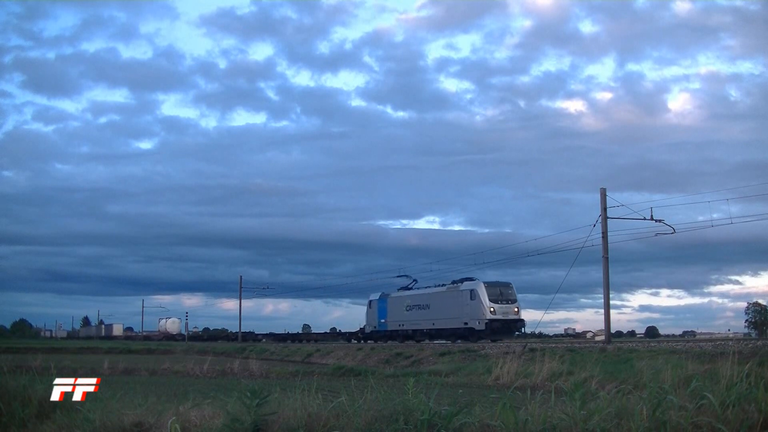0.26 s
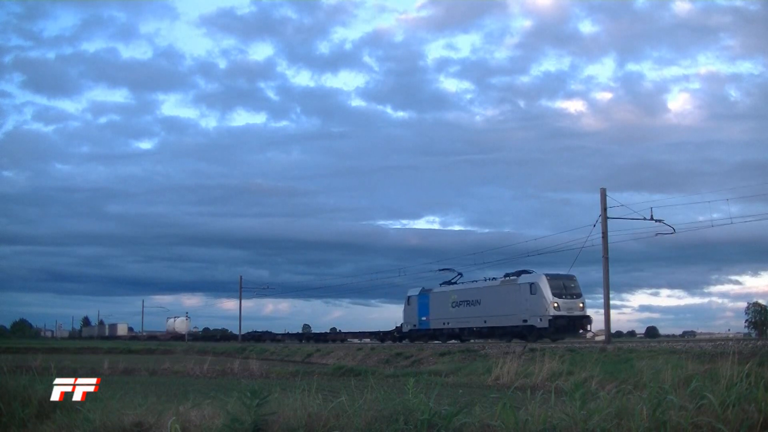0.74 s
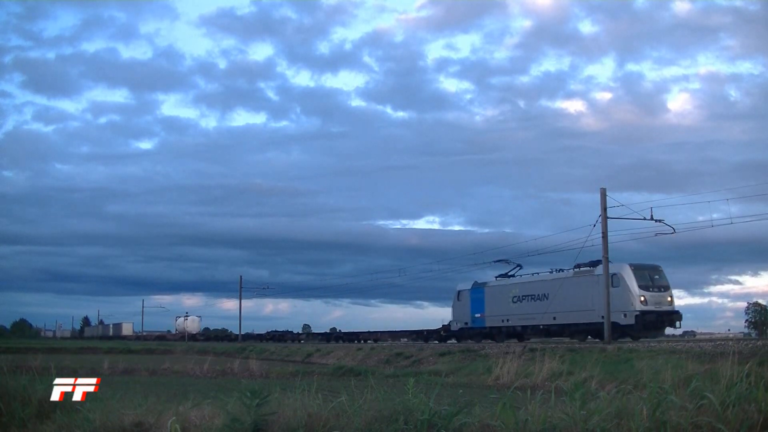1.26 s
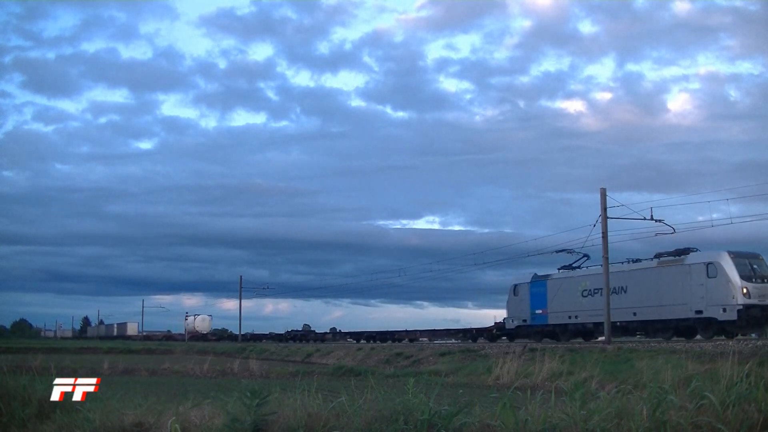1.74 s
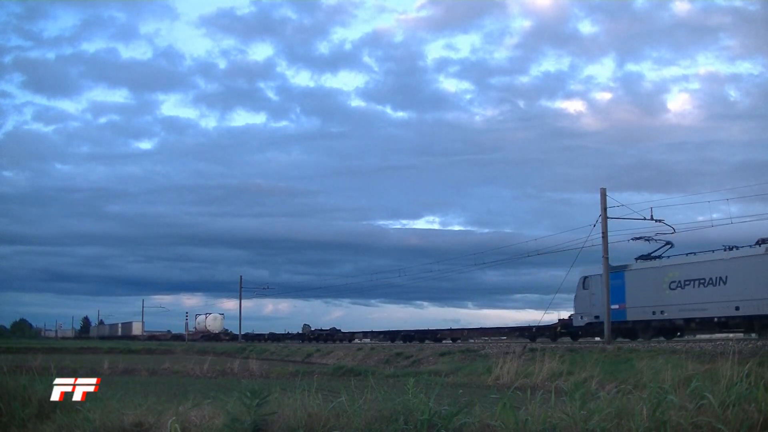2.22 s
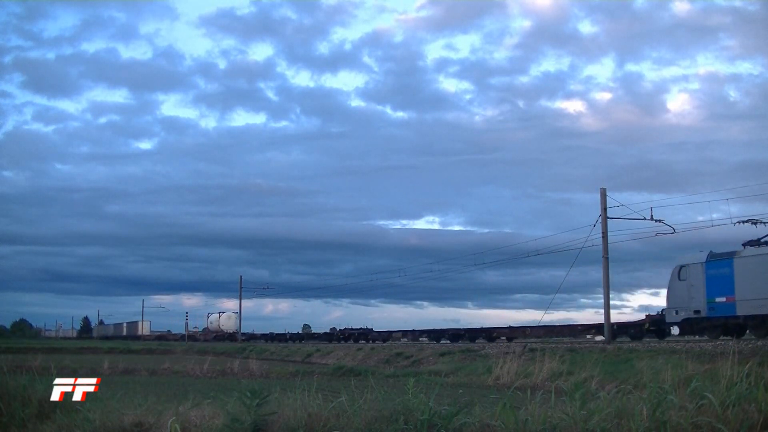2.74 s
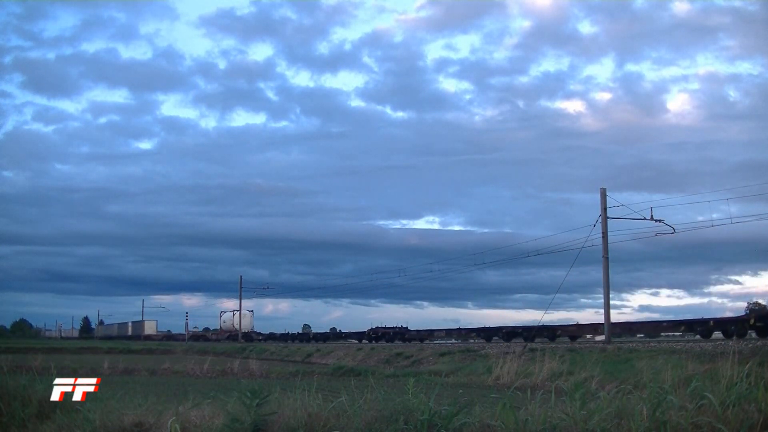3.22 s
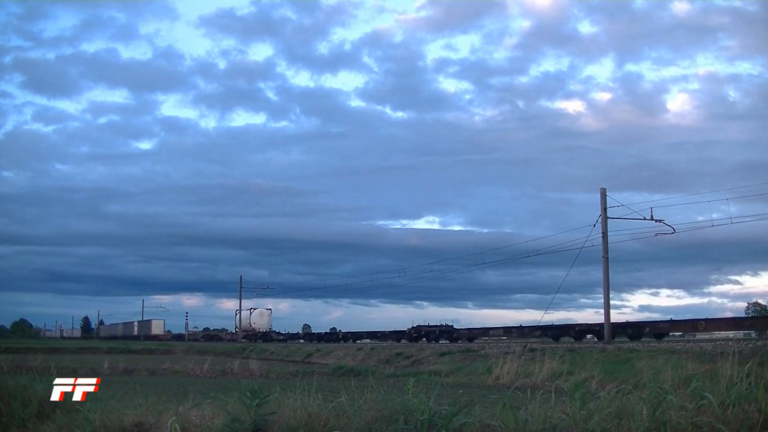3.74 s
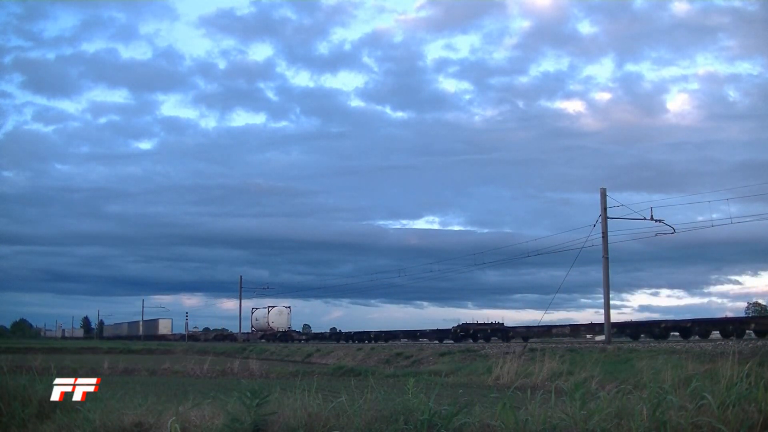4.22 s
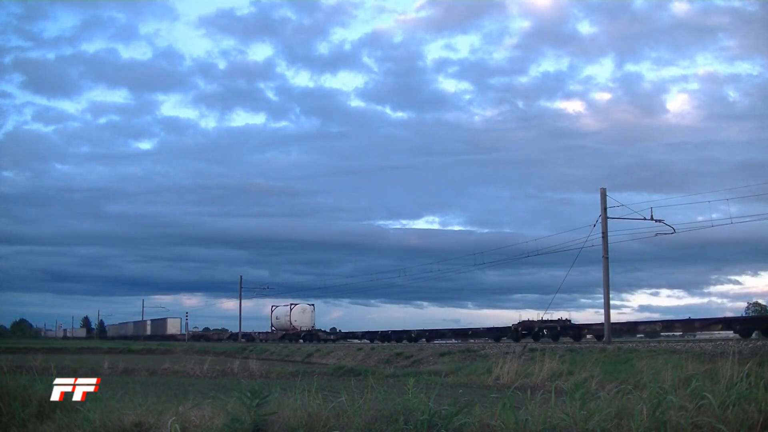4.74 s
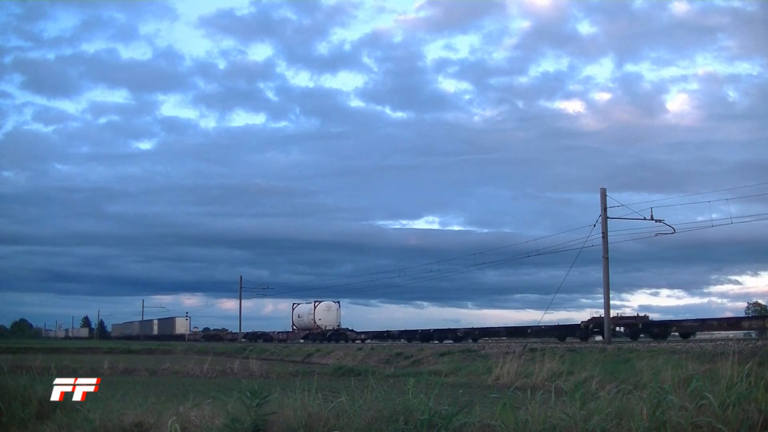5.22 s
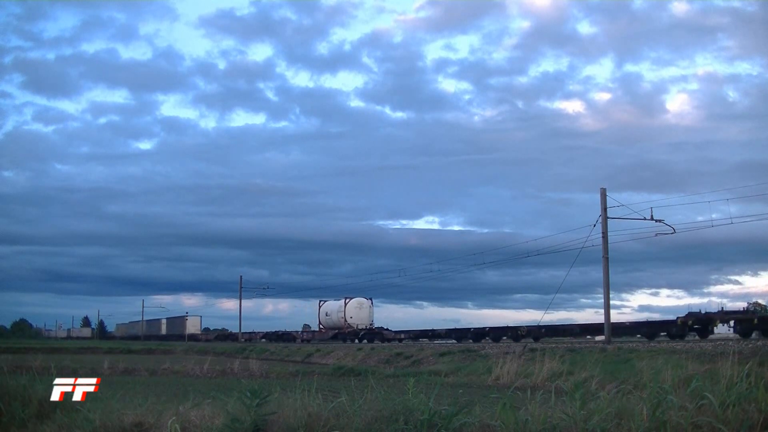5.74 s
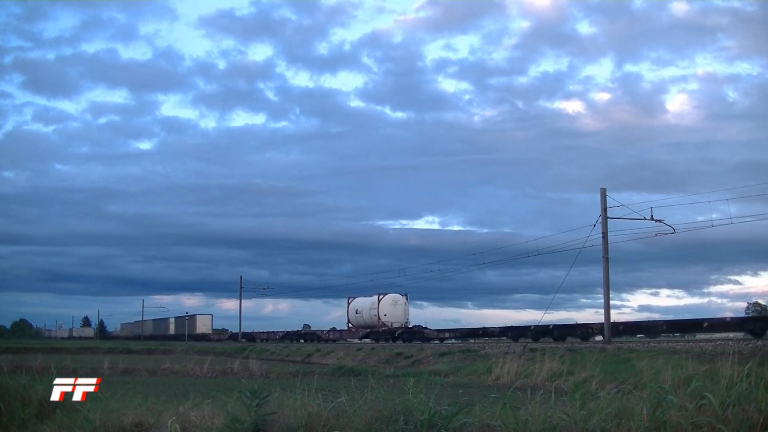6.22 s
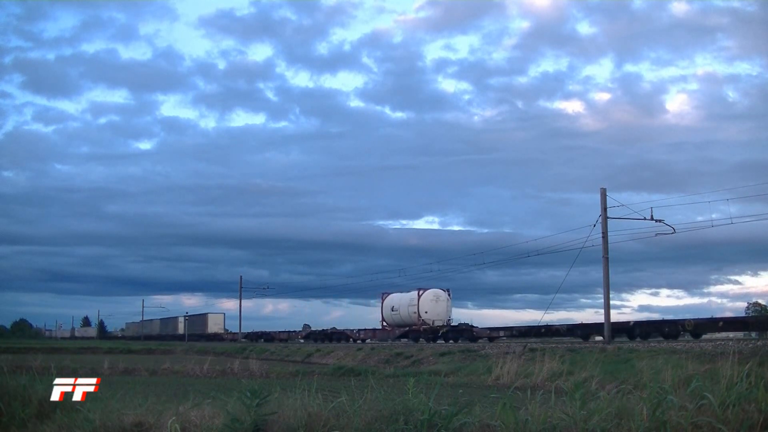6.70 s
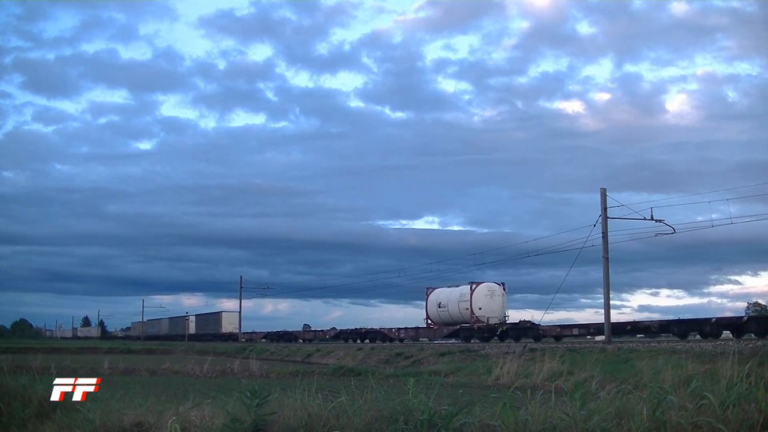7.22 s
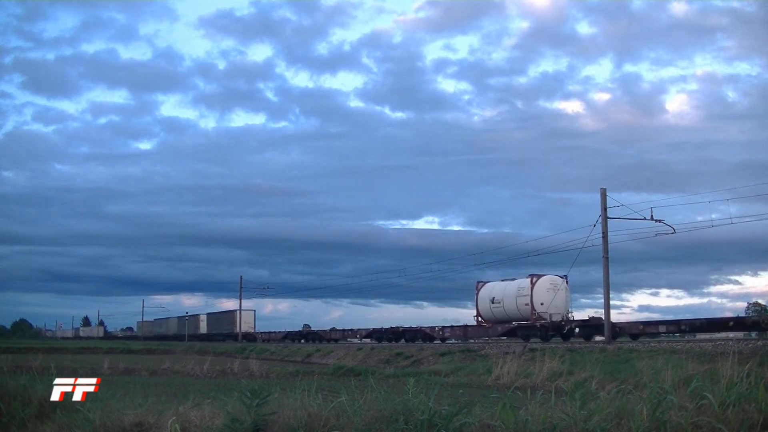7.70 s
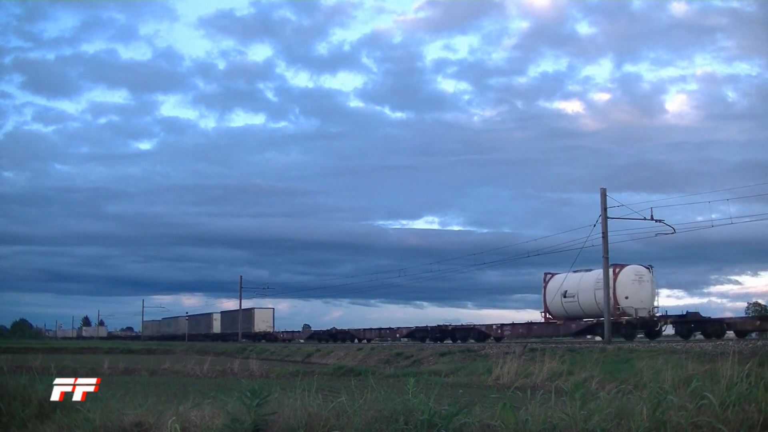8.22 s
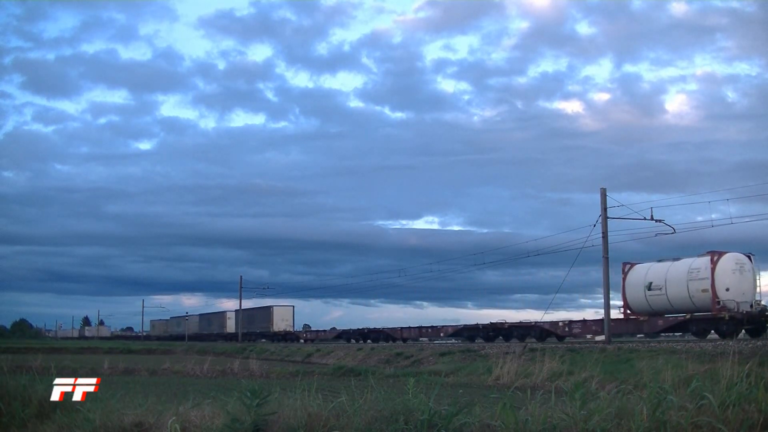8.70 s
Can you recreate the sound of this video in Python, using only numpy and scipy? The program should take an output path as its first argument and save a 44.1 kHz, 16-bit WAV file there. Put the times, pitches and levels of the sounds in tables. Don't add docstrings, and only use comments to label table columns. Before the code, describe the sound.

Outdoors beside a field, a small stereo camera some way from the track hears a freight train pass. The electric locomotive approaches with whining motors, humming blowers and airy hiss, its pitch sagging as it goes by. Rail roar and ringing wheels swell, then wagons roll past with bursts of loose brake gear rattling and clinking. A very faint breeze flutters underneath.

```python
import sys
import numpy as np
from scipy import signal
from scipy.fft import rfft, irfft, next_fast_len
from scipy.io import wavfile
from scipy.ndimage import uniform_filter1d, map_coordinates

SR = 44100
rng = np.random.default_rng(int(sys.argv[2]) if len(sys.argv) > 2 else 0)


def transcribe(signal):
    frames = np.atleast_2d(signal).T
    limited = np.clip(frames, -1, 1)
    pcm = np.round(limited * 32767).astype(np.int16)
    wavfile.write(sys.argv[1], SR, pcm)


def ratio(d):
    e = np.asarray(d, float) / 20
    return 10 ** e


N = 394694

# time in seconds, level in dB under its full level.
APPROACH = [(0, -7.5), (.5, -6.5), (1.5, -4.8), (2.45, -2.5), (3.85, -.5), (5.2, -0.23), (5.8, -0.16),
            (7.4, 0), (8.95, 0)]
# time in seconds, pitch ratio.
DOPPLER = [(0, 1.01), (4, 1.0), (8.95, .988)]
# time in seconds, strength, half length in seconds.
BOGIES = [
    (4.0, 0.52, 0.14),
    (4.78, 1.2, 0.22),
    (5.25, 0.65, 0.24),
    (6.0, 0.66, 0.1),
    (6.3, 1.15, 0.2),
    (6.85, 0.45, .12),
    (7.15, .5, 0.11),
    (7.75, 0.88, 0.31),
    (8.2, 0.38, 0.15),
    (8.95, 0.41, .2),
]
# frequency in Hz, level in dB per Hz.
RAIL_FAR = [(59, -74), (100, -29), (292, -18.5), (351, -24.5), (383, -15), (461, -16.5), (528, -9.5),
            (896, -12.5), (1000, -3), (1090, -8.5), (1900, -9), (2470, -48), (4180, -120)]
RAIL_NEAR = [(59, -74), (100, -32.5), (212, -18.5), (285, -18.5), (383, -13), (444, -12.5), (515, -7),
             (736, -2.5), (1220, -8.5), (1350, -5.5), (1660, -13.5), (1790, -3.5), (1900, -3), (2470, -27),
             (4180, -120)]
# frequency in Hz, level in dB per Hz.
WHEEL_FAR = [(940, -40), (1600, -16), (1940, -6.5), (1980, -8), (2110, -6), (2270, -11.5), (2490, -4),
             (3010, -10), (3980, -14), (4340, -12.5), (5150, -15), (6020, -33.5), (6300, -61), (8190, -60),
             (13900, -120)]
WHEEL_NEAR = [(940, -38), (1600, -7), (1680, -13), (1800, -4), (2140, -2.5), (2470, 0.5), (2670, 1),
              (2890, 1), (3220, -1), (3740, 0.5), (3940, -1.5), (4340, -1), (5210, -7), (5910, -23.5),
              (6300, -19), (8190, -43), (13900, -120)]
# frequency in Hz, level in dB per Hz.
HISS_FAR = [(3410, -38), (5800, -12), (6190, -17), (6980, -1.5), (7220, 0.5), (7580, 1.5), (8570, -7),
            (9560, -21), (10800, -31), (14000, -50), (22000, -120)]
HISS_NEAR = [(3410, -21), (5800, -7.5), (6140, -15.5), (7090, 1.5), (7540, 2.5), (8840, -6), (10100, -26.5),
             (10800, -22), (14000, -50), (22000, -120)]
# time in seconds, lift in dB, half length
# in seconds.
HISS_SWELL = [
    (1.75, 3, .45),
]
# frequency in Hz, spread between wheels in Hz, line width in Hz,
# level in dB against the wheel rush.
DISC_NOTES = [(831, 30, 20, -27), (1827, 25, 25, -24), (2003, 40, 25, -23), (2543, 38, 20, -17),
              (3045, 60, 30, -21), (3710, 24, 28, -21), (4260, 35, 25, -22), (4485, 30, 25, -21.5),
              (5200, 33, 30, -35)]
# time in seconds, length in seconds, frequency in Hz, level in dB.
SINGING_WHEELS = [(0.068, 0.15, 2590, -42), (0.41, 0.13, 4284, -45), (0.42, 0.22, 5290, -49),
                  (2.42, .08, 1920, -43), (2.53, 0.11, 3717, -41), (2.6, .09, 2500, -35),
                  (2.63, .08, 2650, -39), (2.76, .08, 2535, -37), (2.69, .05, 1920, -43),
                  (2.9, .07, 2500, -38), (3.55, .08, 2520, -40), (3.76, .07, 2906, -42),
                  (4.52, .08, 3746, -41), (5.46, .08, 4457, -38), (5.62, .08, 2490, -38),
                  (7.41, .07, 2605, -41), (7.41, .07, 3703, -42), (3.79, 0.42, 4248, -37.5),
                  (3.96, 0.24, 2552, -38), (4.03, 0.44, 3718, -36), (4.398, 0.23, 4308, -37),
                  (4.468, 0.34, 2536, -32), (5.02, 0.18, 2549, -39), (5.32, 0.8, 3720, -40),
                  (5.4, 0.73, 2495, -38), (5.987, 0.19, 2550, -37), (6.34, 0.14, 2511, -37),
                  (6.847, 0.3, 3720, -33), (7.76, 0.33, 2510, -43), (8.06, 0.11, 2490, -36),
                  (8.39, 0.15, 2490, -36), (8.92, 0.09, 1966, -46)]
# time in seconds, level in dB, half length in seconds.
RAIL_BOUNCE = [
    (4.5, -49, .4),
    (5.0, -46, .1),
    (5.75, -44, 0.37),
    (6.3, -45.5, .12),
    (6.9, -48, .3),
    (7.8, -43, 0.18),
    (8.3, -42, 0.24),
]
# time in seconds, level in dB, half length in seconds.
WHINE = [(.05, -50, .15), (.55, -56, .25), (1.317, -44, 0.095), (1.574, -46, 0.063), (1.85, -49, 0.27),
         (2.4, -45, 0.15), (2.717, -40, .14), (2.92, -49, .07), (3.45, -40, 0.094), (3.774, -42, .12),
         (4.222, -46, 0.092), (4.2, -47, 0.55), (4.95, -45, .06)]
# time in seconds, level in dB, half length in seconds.
OCTAVE = [
    (.78, -46, 0.13),
    (1.28, -46, 0.11),
    (1.68, -46, .1),
    (2.0, -49, .1),
    (2.5, -48, 0.29),
    (3.3, -50, .15),
]
# time in seconds, level in dB, half length in seconds.
GEARBOX = [
    (2.0, -49.5, 0.39),
    (2.682, -44, .28),
]
# time in seconds, level in dB, fall in seconds.
BLOWS = [(4.012, -35, .078), (4.368, -34, .044), (4.697, -31, .16), (4.82, -29.5, .05), (5.988, -30, 0.22),
         (6.114, -24.5, .049), (6.216, -29, .046), (6.392, -27.5, 0.07), (6.43, -26.5, .079),
         (6.474, -30, .05), (6.801, -34, .079), (7.146, -30.5, .074), (7.67, -28, 0.072), (7.771, -29, .04)]
# time in seconds, level in dB.
TICKS = [(3.956, -33.5), (4.072, -32), (4.556, -37), (4.596, -30), (4.65, -32), (4.773, -33), (4.888, -32),
         (4.93, -34), (5.03, -33), (5.402, -28), (5.885, -29), (5.942, -30), (6.045, -33), (6.167, -31),
         (6.264, -29), (6.305, -32), (6.345, -33), (6.369, -25.5), (6.891, -35), (7.03, -34), (7.119, -33),
         (7.563, -27), (7.607, -28), (7.725, -29), (7.85, -34), (7.9, -34), (8.148, -35), (8.2, -31),
         (8.897, -33)]
# frequency in Hz, width in Hz, level in dB.
GEAR = [(3080, 56, -0.5), (3495, 64, 5), (3900, 30, 2), (4330, 55, 2.5), (4740, 31, -2), (5200, 66, -9),
        (6760, 50, -20), (7400, 50, -3), (7700, 40, -5), (7900, 23, -16), (8330, 45, -17), (8900, 45, -7),
        (9580, 23, -19), (10930, 35, -28), (11990, 45, -29), (12900, 40, -30), (13270, 35, -28)]
# frequency in Hz, level in dB.
CRACK = [(800, -50), (1600, -28), (3000, 2.5), (4500, 5), (5300, 2), (6100, -13.5), (7400, 2.5),
         (8600, -6.5), (10300, -27), (13000, -26), (14500, -34), (15800, -44)]
# frequency in Hz, level in dB.
STRIKE = [(1500, -40), (3000, -4), (5200, 0), (6100, -10), (7400, 2), (9000, -9), (10300, -27),
          (13000, -24), (15800, -35)]
# time in seconds, frequency in Hz, level in dB, length
# in seconds.
PINGS = [(4.016, 7120, -41, .04), (4.017, 8153, -42, .049), (4.705, 8326, -42, .11), (4.7, 5630, -47, .14),
         (4.75, 7838, -44, .04), (4.773, 7321, -36, .03), (4.82, 4160, -36, .097), (5.408, 3703, -36, .027),
         (6.045, 6870, -40, .03), (6.115, 7400, -38, .028), (6.207, 5733, -52, .22),
         (6.222, 7770, -44, .09), (6.345, 3080, -39, .15), (6.348, 3490, -33, 0.13), (7.03, 7300, -38, .03),
         (7.447, 4465, -34, .05), (7.54, 2950, -28, .018), (7.562, 5200, -39, 0.09),
         (7.605, 7400, -37, .023), (7.669, 5100, -34, .02), (7.674, 13235, -56, .045),
         (7.68, 7250, -48, .042), (7.692, 5660, -43, .07), (7.768, 4690, -29, .022),
         (7.85, 3000, -28, .025), (7.89, 5134, -37, .05), (7.915, 7850, -45, .055),
         (4.698, 7260, -41, .08), (4.698, 8555, -50, .035), (4.72, 4048, -39, .025),
          (4.735, 3460, -36, .035), (4.735, 6258, -53, .04), (4.803, 12000, -63, .06),
          (4.825, 5627, -48, .04), (5.015, 4608, -41, .025), (5.108, 3402, -38, .03),
          (5.99, 8900, -52, .03), (5.994, 3488, -37, .025), (5.998, 11943, -64, .07),
          (6.085, 3919, -36, .025), (6.112, 5627, -44, .09), (6.114, 12000, -57, .02),
          (6.114, 8900, -50, .035), (6.115, 8383, -46, .05), (6.115, 3488, -35, .035),
          (6.116, 4400, -35, .035), (6.217, 4177, -37, .025), (6.217, 8555, -49, .06),
          (6.219, 8326, -49, .04), (6.265, 4651, -42, .03), (6.285, 7751, -42, .03),
          (6.315, 8326, -46, .04), (6.35, 5627, -46, .06), (6.352, 4608, -36, .09),
          (6.362, 2928, -34, .035), (6.4, 4823, -41, .03), (6.405, 10508, -63, .07),
          (6.405, 12116, -58, .07), (6.44, 3057, -31, .045), (6.89, 3370, -37, .035),
          (7.548, 4460, -38, .025), (7.59, 3359, -40, .04), (7.612, 13551, -65, .09),
          (7.678, 3789, -34, .04), (7.682, 9244, -57, .04), (7.695, 5189, -44, .04),
          (7.718, 4220, -35, .035), (7.72, 6660, -48, .045), (7.737, 6144, -53, .045),
          (7.798, 6660, -48, .03), (7.892, 3488, -35, .045), (7.89, 4435, -38, .03), (7.9, 3680, -41, .05),
          (7.91, 3186, -40, .04), (8.845, 8842, -50, .03)]
# frequency in Hz, level in dB,
# length in seconds.
BRAKE_ROD = [(3900, -43, .06), (5615, -50, .2), (5733, -48, .24), (7300, -36, 0.092), (7755, -41, .04),
             (8469, -44, .027)]
BRAKE_BEAM = [(3880, -32, 0.08), (5180, -47, .08), (7330, -36, .1), (7720, -39, .09), (8450, -42, .047),
              (5610, -42, 0.059)]
BRAKE_BLOCK = [(2895, -32, 0.05), (4345, -31, .075), (9790, -57, .05), (10938, -59, .05), (13264, -53, .06)]
# frequency in Hz, level in dB per Hz.
AIR_FAR = [(5880, -39), (10000, -9), (11400, 3.5), (12900, 1), (14000, -6), (15100, -4), (15600, 2)]
AIR_NEAR = [(7500, -20), (9300, 7), (10300, -6.5), (11400, -4.5), (12800, 1.5), (13400, 1.5), (14600, -1),
            (15600, -16)]
# time in seconds, lift in dB, half length in seconds.
PUFFS = [
    (.9, 3, .15),
    (3.27, 5, 0.087),
    (3.4, 6, .08),
    (3.5, 5, .04),
    (3.71, 4.5, 0.062),
    (6.43, 8, 0.056),
]
# frequency in Hz, level in dB.
SCATTER = [(200, -19), (700, -21), (1500, -35), (3000, -20), (4000, -25), (5200, -28), (6100, -2),
           (7000, -17), (8500, -14.5), (10000, -30), (12000, -14), (15000, -14)]
# frequency in Hz, left minus right in dB.
PORTS_DB = [(100, 1.5), (400, -1), (700, -2), (2200, -2), (2800, -3), (3700, 1), (5300, -1.2), (6100, -0.5),
            (6900, -0.5), (7900, -1.5), (8900, -3.5), (10000, 7.5), (15000, -2)]
# frequency in Hz, radians by which left leads.
PORTS_TURN = [(0, 0), (340, -0.22), (2580, 0.03), (3270, 0.37), (3880, -0.085), (5340, 0.2), (5770, -0.11),
              (6030, 0.3), (6370, 0.4), (7320, -0.24), (8530, 0.27), (9820, -0.052), (15300, 0.0)]
# frequency in Hz, level in dB per Hz.
BREEZE = [(20, 0), (110, 0), (150, -8), (300, -50)]

RAIL_DB, WHEEL_DB, HISS_DB, AIR_DB = -33, -27, -45.5, -62.5
LOCO_S = 3.3
MOTOR_EARLY_HZ, MOTOR_LATER_HZ, FAN_RATIO = 1031, 1001, .53
TICK_FALL_S = .022


def unit(x):
    return x / np.sqrt(np.mean(x ** 2) + 1e-20)


def along(points, hz):
    f, v = np.transpose(points)
    return np.interp(np.log(hz + 1), np.log(f + 1), v)


def curve(rows):
    s, values = np.transpose(rows)
    return np.interp(np.arange(N) / SR, s, values)


def wobble(rate):
    knots = rng.standard_normal(int(N * rate / SR) + 4)
    return map_coordinates(knots, [np.arange(N) * rate / SR], order=1)


def swells(rows):
    time = np.arange(N) / SR
    return sum(height * np.exp(-((time - s) / half) ** 2) for s, height, half in rows)


def swells_db(rows):
    return swells([(s, ratio(db), half) for s, db, half in rows])


def filtered(x, response):
    m = next_fast_len(x.shape[-1] + SR // 2)
    return irfft(rfft(x, m) * response(np.fft.rfftfreq(m, 1 / SR)), m)[..., :x.shape[-1]]


def fuzzy_line(phase, width):
    return wobble(width) * np.cos(phase) + wobble(width) * np.sin(phase)


def rush(far, near, share, patchy_db):
    z = signal.stft(rng.standard_normal(N), nperseg=512)[2]
    field = uniform_filter1d(rng.standard_normal(z.shape), 2, 0)
    field = unit(uniform_filter1d(field, 22, 1))
    noise = signal.istft(z * ratio(patchy_db * field), nperseg=512)[1][:N]
    a, b = (unit(filtered(noise, lambda hz: ratio(along(s, hz)))) for s in (far, near))
    return (1 - share) * a + share * b


def loco_closeness():
    ahead = np.arange(N) / SR - LOCO_S
    return np.exp(-(ahead / np.where(ahead < 0, 2.3, .76)) ** 2)


def rolling():
    time = np.arange(N) / SR
    close_db, rough = curve(APPROACH), swells(BOGIES)
    axles = wobble(6)

    rail_db = RAIL_DB + 1.57 * close_db - 1.1 + .51 * axles
    rail_near = np.interp(time, [1.2, 5.6], [0, 1])
    rail = ratio(rail_db) * rush(RAIL_FAR, RAIL_NEAR, rail_near, patchy_db=.68)

    wheel_db = WHEEL_DB + close_db + 1.34 * rough
    wheel_near = np.interp(time, [.5, 4.5], [0, 1])
    wheel = ratio(wheel_db - 1.62 + .5 * axles) * rush(WHEEL_FAR, WHEEL_NEAR, wheel_near, patchy_db=1.03)

    hiss_db = HISS_DB + .3 * close_db + 4.5 * rough
    hiss_db += 3 * loco_closeness() ** .65 + swells(HISS_SWELL)
    hiss_db += .5 + 1.2 * axles + .73 * wobble(17)
    hiss_near = np.interp(time, [1, 2.4], [0, 1])
    hiss = ratio(hiss_db) * rush(HISS_FAR, HISS_NEAR, hiss_near, patchy_db=2.0)
    return rail + wheel + hiss + ratio(wheel_db) * discs(count=4)


def discs(count):
    time = np.cumsum(curve(DOPPLER)) / SR
    hidden_db = 2.5 * np.clip(-curve(APPROACH) / 5, 0, 1)
    out = np.zeros(N)
    for hz, spread, width, db in DISC_NOTES:
        loss_db = hidden_db * max(hz / 1000 - 2.6, 0)
        for off in np.linspace(-1, 1, count):
            phase = 2 * np.pi * (hz + off * spread) * time
            out += ratio(db + 1.9 * wobble(4) - loss_db) * fuzzy_line(phase, width)
    return out


def singing():
    time = np.arange(N) / SR
    tremble = 2 * np.pi * np.cumsum(13 * wobble(50)) / SR
    flutter = ratio(2.4 * wobble(30))
    out = np.zeros(N)
    for s, length, hz, db in SINGING_WHEELS:
        at = slice(max(round((s - length) * SR), 0), round((s + length) * SR))
        swell = np.exp(-((time[at] - s) / (.47 * length)) ** 2)
        own_flutter = np.roll(flutter, round(hz) * 50)[at]
        tone = np.sin(2 * np.pi * hz * time[at] + tremble[at])
        out[at] += ratio(db + 1.0) * swell * tone * own_flutter
    return out


def rail_bounce():
    level = ratio(-50 + 3.2 * curve(APPROACH)) + swells_db(RAIL_BOUNCE)
    phase = 2 * np.pi * 757 * np.arange(N) / SR
    return level * unit(fuzzy_line(phase, 110))


def whine():
    time = np.arange(N) / SR
    close = 1 / (1 + np.exp((time - 1.55) / .45 * 1.5))
    hz = MOTOR_LATER_HZ + (MOTOR_EARLY_HZ - MOTOR_LATER_HZ) * close
    hz -= 9 * np.maximum(time - LOCO_S, 0)
    phase = 2 * np.pi * np.cumsum(hz + 3.51 * wobble(20)) / SR
    heard = 1 / (1 + np.exp((time - 5.1) / .15))

    tone_level = ratio(-56) * heard + swells_db(WHINE)
    tone = tone_level * ratio(2.5 + 1.0 * wobble(14)) * np.sin(phase)
    octave_level = ratio(-52.5) * heard + swells_db(OCTAVE)
    octave = octave_level * ratio(3.5 + 1.9 * wobble(8.46)) * np.sin(2 * phase + 1.35 * wobble(45))

    fan_db = -52 + 1.3 * curve(APPROACH) - 25 * np.clip(time - 5.1, 0, 1)
    fan_tone = np.sin(2 * np.pi * FAN_RATIO * np.cumsum(hz) / SR)
    hum = ratio(fan_db - 2.0) * (1 + .6 * wobble(15)) * fan_tone
    roar = swells_db(GEARBOX) * 2 * wobble(220) * np.sin(.97 * phase)
    return tone + octave + hum + roar


def gear_ring(f):
    total = 0
    for k, (centre, width, db) in enumerate(GEAR):
        drag = 1j * f * width
        total = total + (-1) ** k * ratio(db) * drag / (centre * centre - f * f + drag)
    return total


def rattles():
    t = np.arange(SR // 4) / SR
    chatter, strikes = np.zeros((2, N + SR))
    strike_shape = ratio(-9 * t / .004) * np.minimum(t / .001, 1) * (t < .03)
    for s, db, fall in BLOWS + [(s, db, TICK_FALL_S) for s, db in TICKS]:
        noise = rng.standard_normal(len(t))
        rise = .002 + .03 * fall
        burst = np.minimum(t / rise, ratio(-20 * (t - rise) / fall))
        start = round(s * SR)
        strikes[start:][:len(t)] += ratio(db + 7.5) * strike_shape * noise[::-1]
        chatter[start:][:len(t)] += ratio(db) * burst * noise
    ringing = filtered(chatter[:N], lambda hz: ratio(12.0) * gear_ring(hz) + ratio(2.5 + along(CRACK, hz)))
    contacts = filtered(strikes[:N], lambda hz: ratio(along(STRIKE, hz)))
    return ringing + contacts + pings()


def pings():
    t = np.arange(SR // 2) / SR
    out = np.zeros(N + SR)
    tremble, flutter = .8 * wobble(45), ratio(2.5 * wobble(70))
    notes = PINGS
    for s, part in ((5.99, BRAKE_ROD), (6.4, BRAKE_BEAM), (6.428, BRAKE_BLOCK)):
        notes = notes + [(s, *mode) for mode in part]
    for s, hz, db, length in notes:
        turn, place = rng.random(2)
        first = int(place * (N - len(t)))
        shake = slice(first, first + len(t))
        shape = (1 - np.exp(-t / .0028)) * np.exp(-(t / length) ** 1.8) * flutter[shake]
        tone = np.sin(2 * np.pi * (hz * t + turn) + tremble[shake])
        out[round(s * SR):][:len(t)] += ratio(db + 3.5) * shape * tone
    return out[:N]


def air():
    db = AIR_DB + 9.5 * loco_closeness() + swells(PUFFS) + 5 * swells(BOGIES)
    near = np.interp(np.arange(N) / SR, [.9, 2.6, 4, 4.8], [.1, 1, .81, .65])
    return ratio(db + 3.0 + 1.0 * wobble(8.3)) * rush(AIR_FAR, AIR_NEAR, near, patchy_db=-2.0)


def scene():
    body = rolling() + singing() + whine() + rattles() + rail_bounce()
    top = air()
    f, _, z = signal.stft(body + top, SR, nperseg=256)
    spin = np.exp(2j * np.pi * rng.random(z.shape)) * ratio(along(SCATTER, f) + 3.5)[:, None]
    scattered = signal.istft(z * spin, SR, nperseg=256)[1][:N]
    drift = ratio(.37 * (-1.2 - .4 * curve(APPROACH)))
    return np.array([body * drift + top + scattered, body / drift + top - scattered])


def top_dropouts(x):
    time = np.arange(N) / SR
    rough = swells(BOGIES)
    need = np.where(time < 4.02, 0, wobble(24) - 1.3 * rough + .5)
    for edge_hz, limit in ((15050, -.1), (15400, -.6), (14650, .9)):
        lost = uniform_filter1d(1. * (time > 3.28) * (need > limit), size=600)
        x = x - lost * filtered(x, lambda hz: hz > edge_hz)
    hole = uniform_filter1d(1. * (time > 4.02) * (wobble(30) + .6 * rough > 1.4), size=300)
    return x - hole * filtered(x, lambda hz: (hz > 9850) & (hz < 10600))


def breeze():
    noise = filtered(rng.standard_normal((2, N)), lambda hz: ratio(along(BREEZE, hz)))
    own = np.array([wobble(9), wobble(9)])
    return ratio(-81.5 + np.linspace(-5, 2, N) + 4 * wobble(8) + 3 * own) * unit(noise)


def band_limit(x):
    return signal.sosfilt(signal.butter(12, 15790, fs=SR, output="sos"), x)


def record(dry):
    side = np.array([[.5], [-.5]])

    def port(hz):
        bass_cut = 1 / (1 + (142 / (hz + 1)) ** 8)
        return ratio(side * along(PORTS_DB, hz)) * bass_cut * np.exp(1j * side * along(PORTS_TURN, hz))

    mix = top_dropouts(filtered(dry, port)) + breeze()
    return band_limit(mix)


dry = scene()
out = record(dry)
transcribe(out)
```